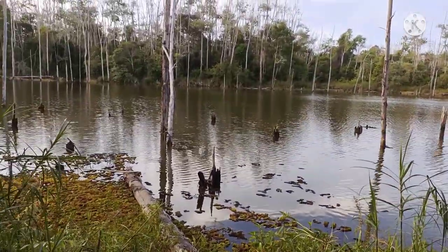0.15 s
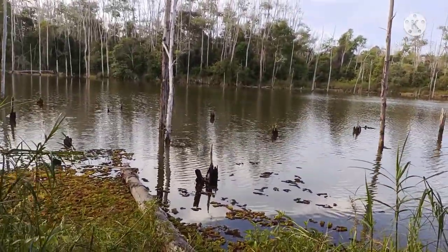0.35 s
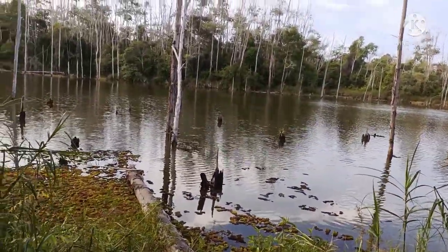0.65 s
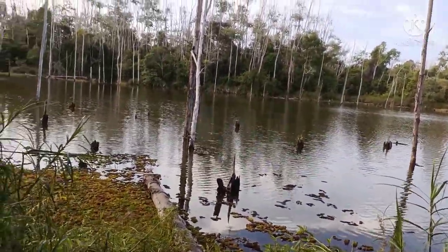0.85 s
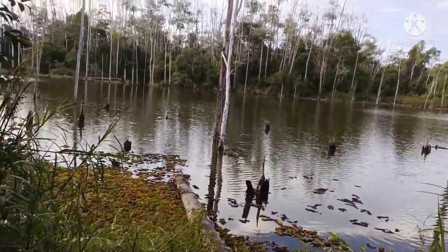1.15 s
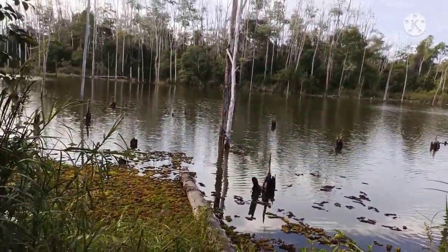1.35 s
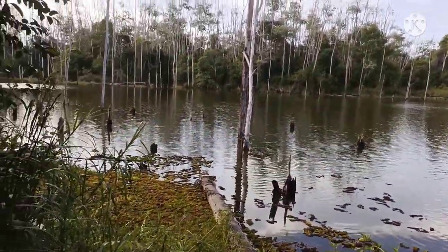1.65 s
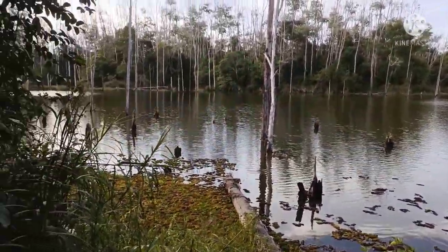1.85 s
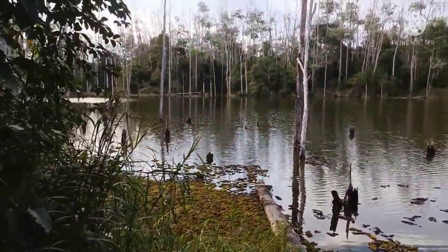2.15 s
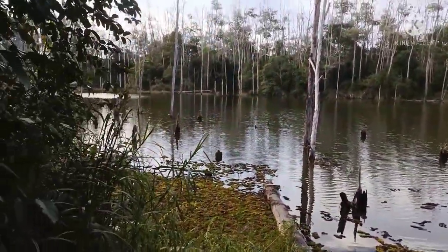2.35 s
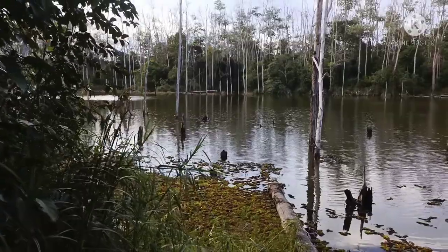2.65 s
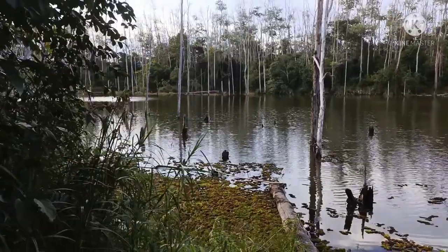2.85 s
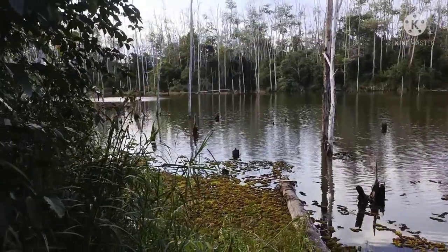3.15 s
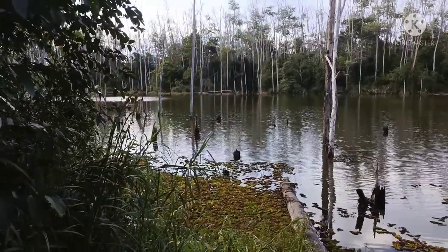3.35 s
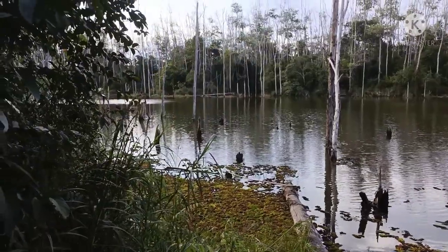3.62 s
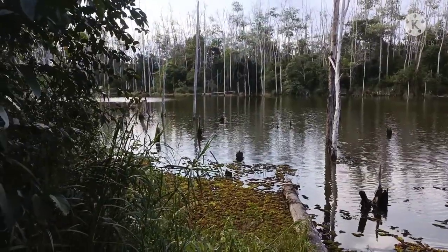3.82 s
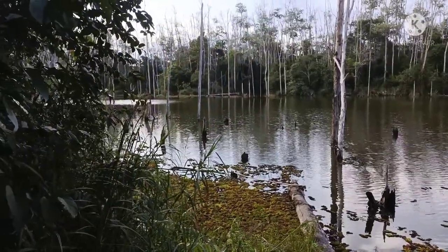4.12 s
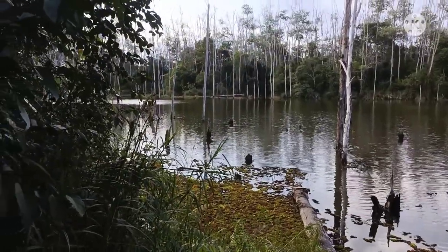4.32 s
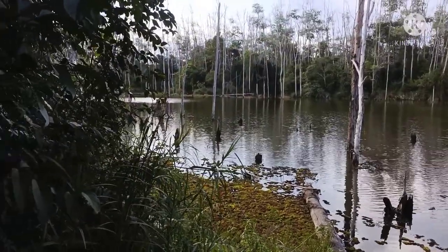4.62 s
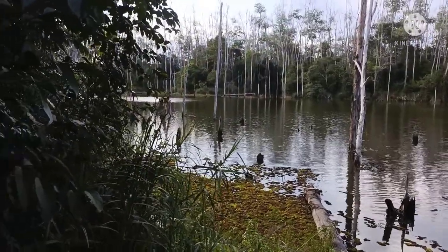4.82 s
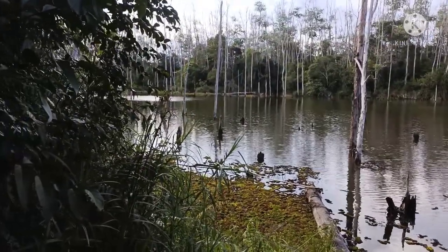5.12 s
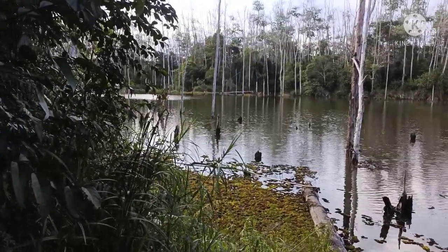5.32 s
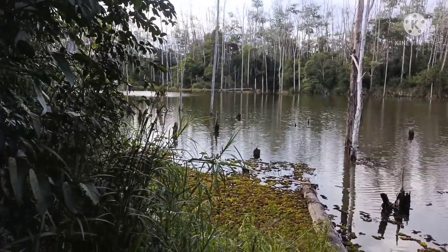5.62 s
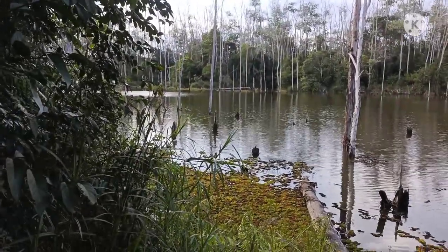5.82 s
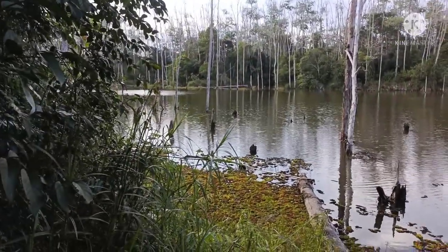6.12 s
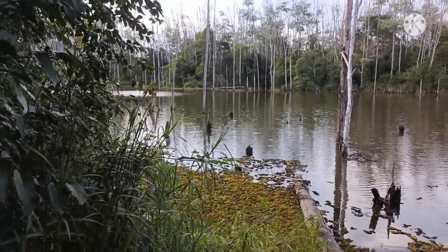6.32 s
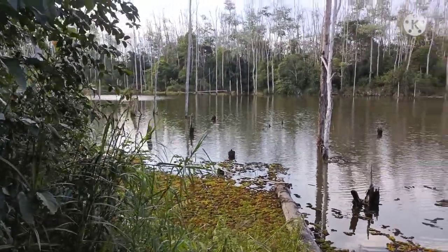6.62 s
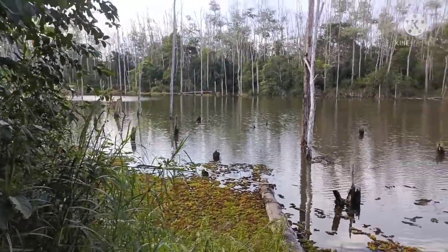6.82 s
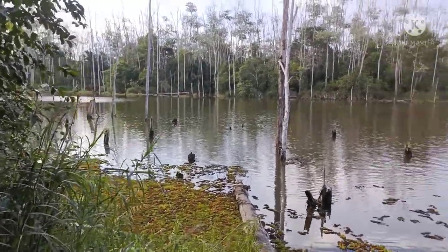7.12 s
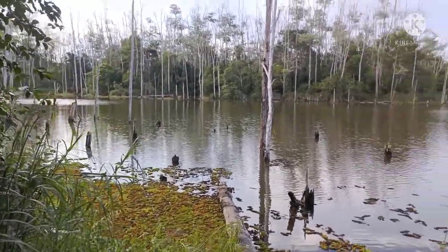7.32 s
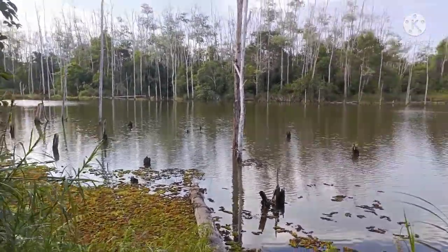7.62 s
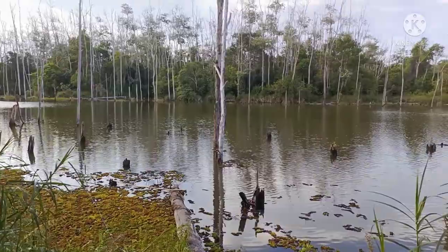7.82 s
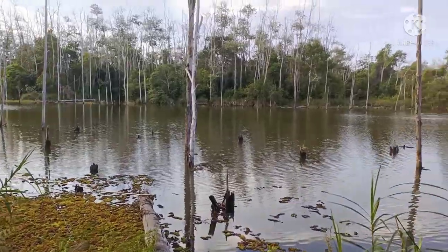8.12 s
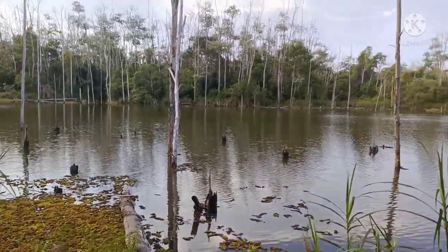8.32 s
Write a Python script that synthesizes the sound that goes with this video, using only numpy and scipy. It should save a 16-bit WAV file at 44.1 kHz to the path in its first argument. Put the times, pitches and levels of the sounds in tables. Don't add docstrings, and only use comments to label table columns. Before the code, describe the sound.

Outdoor swamp heard through a handheld phone. A close cricket chirps about twelve times a second over a continuous high chorus, with cicadas buzzing and a katydid rasping. Feet and cloth brush dry grass close by, with ticks and sharp stem snaps, until about three and a half seconds. Distant birds whistle and swoop with short woodland echoes, a faint frog toks, and wind and a far engine rumble up near the end.

```python
import sys
import numpy as np
from scipy import signal
from scipy.fft import rfft, irfft
from scipy.io import wavfile

SR = 44100
rng = np.random.default_rng(int(sys.argv[2]) if len(sys.argv) > 2 else 0)


def boost(x):
    u = np.asarray(x, float) / 20
    return 10 ** u


def to_wav(sig):
    pcm = np.clip(np.atleast_2d(sig), -1, 1) * 32767
    pcm = np.round(pcm).astype(np.int16)
    wavfile.write(sys.argv[1], SR, pcm.T)


N = 373086


def rms_one(x):
    return x / np.sqrt(np.mean(x ** 2) + 1e-20)


def in_time(rows):
    s, level = np.transpose(rows)
    return np.interp(np.arange(N) / SR, s, level, right=level[-1])


def colour(x, spectrum):
    hz, db = np.transpose(spectrum)
    log_hz = np.log(np.arange(N // 2 + 1) * SR / N + 1)
    gain = boost(np.interp(log_hz, np.log(hz), db))
    return rms_one(irfft(rfft(x) * gain, N))


def drift(rate):
    r = np.exp(-80 * np.pi * rate / SR)
    white = rng.standard_normal(N // 40 + 2002)
    slow = signal.lfilter([1], [1, -2 * r, r * r], white)[2000:]
    return np.interp(np.arange(N) / 40, np.arange(len(slow)), rms_one(slow))


def resonate(x, hz, width_hz):
    r = np.exp(-np.pi * width_hz / SR)
    for _ in range(2):
        x = signal.lfilter([1, 0, -1], [1, -2 * r * np.cos(2 * np.pi * hz / SR), r * r], x + 1e-18)
    return rms_one(x)


def band(x, low_hz, high_hz, order=2):
    sos = signal.butter(order, [low_hz, high_hz], "band", fs=SR, output="sos")
    return signal.sosfilt(sos, x + 1e-18)


def add(out, s, sound):
    i = round(s * SR)
    out[i:i + len(sound)] += sound[:max(N - i, 0)]


def note(length, from_hz, to_hz, glide, edge, fainter_db=0):
    t = np.arange(int(length * SR)) / SR
    hz = to_hz + (from_hz - to_hz) * np.exp(-t / glide)
    ends = np.clip(np.minimum(t, length - t) / edge, 0, 1)
    octaves_off = np.abs(np.log2(hz / to_hz))
    shape = np.sin(np.pi / 2 * ends) ** 2 * boost((fainter_db - 8) * octaves_off)
    return np.sqrt(2) * shape * np.sin(2 * np.pi * (np.cumsum(hz) / SR + rng.random()))


def swells(s, hold, db, rise_db_per_s, fall_db_per_s):
    t = np.arange(0, N + 64, 64) / SR
    s, hold, db = (np.reshape(v, (-1, 1)) for v in (s, hold, db))
    before, after = np.clip(s - t, 0, None), np.clip(t - s - hold, 0, None)
    each_db = db - rise_db_per_s * before - fall_db_per_s * after
    power = np.sum(boost(np.maximum(2 * each_db, -400)), axis=0)
    return np.interp(np.arange(N) / SR, t, np.sqrt(power))


def pulses(per_s, jitter, spread_db):
    count = np.cumsum(per_s * (1 + jitter * drift(3.0)) / SR)
    clicks = np.diff(np.floor(count), prepend=0) > 0
    return clicks * boost(spread_db * rng.standard_normal(N)), count


def echo(x, tail, wet_db):
    return x + boost(wet_db) * signal.fftconvolve(x, tail / np.linalg.norm(tail))[:N]


def forest(x, t60, wet_db):
    t = np.arange(SR // 2) / SR
    return echo(x, rng.standard_normal(len(t)) * boost(-60 * t / t60) * np.minimum(t / 0.003, 1), wet_db)


def held_tail(x, spread_s, wet_db):
    t = np.arange(SR // 2) / SR
    fade = np.exp(-(t / spread_s) ** 2) + .17 * np.exp(-t / .11)
    return echo(x, rng.standard_normal(len(t)) ** 3 * fade * np.minimum(t / .012, 1), wet_db)


# pitch in Hz, level in dB per Hz.
AIR_SPECTRUM = [(15, -63), (25, -50), (101, -6.5), (133, -4.5), (366, -16.5), (634, -23.5), (679, -22.5),
                (1150, -22), (2400, -27), (3620, -26.5), (4450, -32.5), (6000, -43.5), (7800, -71),
                (13200, -120)]


def swamp_air():
    stir_db = .8 * drift(4.0)
    return boost(-65.5 + stir_db) * colour(rng.standard_normal(N), AIR_SPECTRUM)


# time of the peak in seconds, peak level in dB.
GUSTS = [(0, -57.5), (1.32, -59), (1.842, -51.5), (4.95, -68), (5.561, -58.5), (5.74, -59), (5.968, -68),
         (6.17, -64), (7.089, -62), (7.759, -44), (8.37, -45)]


def gust_gain():
    s, db = np.transpose(GUSTS)
    return swells(s, 0, db, rise_db_per_s=212, fall_db_per_s=177.5)


def wind(gusts):
    white = rng.standard_normal(N)
    rumble = resonate(white, 68, 24) + 0.12 * rms_one(band(white, 30, 48))
    return (boost(-64) + gusts) * rumble


def thumps():
    out = np.zeros(N)
    length_s = 0.0885
    for s, db in GUSTS:
        thump = note(length_s, 79, 68.5, 0.041, edge=length_s / 2)
        add(out, max(s - length_s / 2, 0), boost(db - 1) * thump)
    return out


# time in seconds, level in dB.
ENGINE_HUM = [
    (0, -67),
    (1.2, -64),
    (1.74, -66),
    (3.5, -61),
    (5.48, -66),
    (6.2, -69),
    (7.1, -62.5),
    (7.6, -48),
    (8.46, -51.5),
]
# time in seconds, level in dB.
ENGINE_OVERTONE = [
    (0, -78),
    (.7, -66),
    (2, -75),
    (4.8, -70.5),
    (5.25, -58.5),
    (5.6, -75),
    (7, -78),
    (8.46, -114),
]


def engine(gusts):
    white = rng.standard_normal((2, N))
    boom = gusts * boost(-9 + 2 * np.arange(N) / SR)
    hum = (boost(in_time(ENGINE_HUM)) + boom) * resonate(white[0], 101.54, 12.5)
    overtone = boost(in_time(ENGINE_OVERTONE)) * resonate(white[1], 341.0, 93)
    return hum + overtone + boost(-85.0) * resonate(white[1], 370.7, 13)


# start in seconds, level in dB.
FROG_TOKS = [(1.9, -66.5), (2.55, -70.5), (4.15, -73), (4.645, -72), (5.12, -79), (5.75, -69), (6.245, -72),
             (6.715, -74), (7.335, -67.5), (7.82, -78), (8.3, -71.5)]


def frog():
    out = np.zeros(N)
    for s, db in FROG_TOKS:
        add(out, s, boost(db + 6.0) * note(0.043, 909, 588, 0.0231, 0.013))
    return held_tail(out, spread_s=0.059, wet_db=-2.0)


def level_notes(rows):
    return [(s, length, hz * 1.011, hz, 0.0075, db) for s, length, hz, db in rows]


def gliding_notes(rows, share):
    return [(s, length, from_hz, to_hz, share * length, db) for s, length, from_hz, to_hz, db in rows]


def bird_voice(notes, hoarse, rattle, fainter_db=0):
    voice = np.zeros(N)
    for s, length, from_hz, to_hz, glide, db in notes:
        add(voice, s, boost(db - 2.0) * note(length, from_hz, to_hz, glide, 0.0061, fainter_db))
    return voice * (np.sqrt(1 - hoarse ** 2) + hoarse * rattle)


# start in seconds, length in seconds, pitch in Hz, level in dB.
COOS = [(.41, 0.08, 3160, -50), (.495, 0.056, 3150, -67), (1.07, 0.11, 1280, -66),
        (2.005, 0.055, 1170, -67), (2.08, 0.024, 1033, -60), (4.17, 0.031, 1192, -72),
        (1.896, 0.024, 972, -60), (3.19, 0.14, 1248, -61), (3.43, 0.092, 1272, -58),
        (4.25, 0.014, 990, -56), (7.03, 0.019, 1028, -72), (7.15, 0.028, 1090, -71),
        (7.24, 0.046, 1000, -70), (3.64, 0.054, 1270, -71.5), (7.29, 0.081, 1264, -56),
        (7.42, 0.028, 1250, -63.5), (7.69, 0.024, 1178, -71), (7.49, 0.034, 1243, -71),
        (7.795, 0.028, 1234, -71.5), (7.87, 0.033, 1224, -68.5)]
PIPS = [(.435, 0.02, 1750, -58), (3.0, 0.083, 2850, -74), (3.22, 0.047, 2200, -61),
        (2.63, 0.059, 1934, -64), (3.71, 0.014, 2150, -55.5), (4.95, 0.0095, 1880, -58),
        (5.255, 0.025, 3020, -70), (4.99, 0.012, 2200, -65), (5.48, 0.028, 2010, -68),
        (5.51, 0.041, 2680, -66.5), (5.6, 0.058, 2760, -69.5), (6.13, 0.03, 2800, -64),
        (6.35, 0.045, 2790, -64), (6.5, 0.04, 2777, -71.5), (6.855, 0.016, 1990, -59.5),
        (.29, 0.028, 2430, -61), (.29, 0.026, 3050, -58), (2.665, 0.016, 2550, -63),
        (3.09, 0.016, 2520, -59.5), (3.31, 0.13, 1824, -69), (3.8, 0.026, 2336, -65),
        (5.925, 0.034, 2770, -63), (6.03, 0.043, 2740, -61.5), (6.01, 0.034, 1770, -75),
        (6.735, 0.022, 2420, -72), (6.95, 0.022, 2630, -77), (6.97, 0.014, 1820, -70),
        (7.1, .02, 2440, -78)]
SEEPS = [(.27, 0.085, 3780, -62), (2.78, 0.029, 3820, -64), (3.892, 0.093, 3740, -65),
         (3.7, 0.06, 4100, -72), (4.405, 0.024, 3650, -74), (1.06, 0.12, 3350, -73), (3.78, .07, 4100, -79),
         (5.72, .025, 4700, -72), (5.755, 0.035, 5850, -73), (3.6, 0.095, 3270, -69),
         (6.765, 0.027, 3800, -80), (6.01, 0.036, 3600, -59), (5.965, 0.04, 3800, -61),
         (4.955, 0.029, 5780, -59), (4.96, 0.088, 4970, -75), (5.01, 0.1, 3300, -58),
         (5.66, 0.057, 3710, -71), (5.735, 0.06, 3690, -65.5), (5.74, .025, 5600, -75),
         (6.16, 0.068, 3760, -61.5), (6.68, 0.057, 3510, -76.5), (7.575, 0.02, 5460, -77),
         (7.64, 0.16, 3800, -68), (7.76, 0.12, 3260, -65), (9.2, 0.076, 2920, -68),
         (5.11, 0.051, 3300, -76), (5.785, 0.05, 4950, -75), (7.65, .13, 4420, -68),
         (6.41, 0.065, 4330, -84), (4.03, 0.074, 3750, -67), (7.95, 0.045, 4500, -59),
         (8.0, 0.09, 4520, -67)]
# start in seconds, length in seconds, first pitch in Hz, end pitch in Hz, level in dB.
SWOOPS = [(.378, 0.04, 2400, 3200, -52), (2.91, 0.11, 2164, 1804, -58), (3.12, 0.061, 2205, 1750, -49),
          (4.61, 0.053, 3900, 3174, -55), (4.935, 0.075, 6020, 3330, -45.5),
          (5.815, 0.058, 3500, 3090, -55.5), (7.58, 0.06, 5500, 3200, -51), (7.625, 0.13, 3400, 2867, -54),
          (7.77, 0.056, 3480, 3206, -58), (7.905, 0.06, 3620, 4610, -63), (7.985, 0.045, 4450, 3750, -65),
          (6.73, 0.035, 1250, 2050, -68), (6.945, 0.043, 1350, 2090, -67), (7.06, 0.041, 1300, 1990, -71.5)]
SLIDES = [(.72, 0.14, 4480, 4200, -76), (1.58, 0.17, 4550, 4400, -66), (1.887, 0.47, 4550, 4300, -62.5),
          (2.44, 0.092, 4100, 3500, -55), (2.56, 0.039, 3560, 2000, -54.5), (2.725, 0.12, 4480, 4330, -68),
          (2.87, 0.2, 4550, 4320, -69), (2.8, 0.12, 3850, 3774, -69), (2.47, 0.092, 3300, 2950, -59.5),
          (2.62, 0.1, 3600, 3380, -73), (3.23, 0.11, 3450, 3250, -73), (5.243, 0.053, 4650, 4530, -71),
          (5.62, .035, 5260, 3920, -68.5), (5.78, 0.065, 4950, 4770, -71), (5.77, 0.062, 4450, 4500, -67),
          (5.83, 0.074, 4800, 4300, -62), (5.96, 0.08, 4600, 4400, -81), (5.965, 0.039, 4100, 3710, -59),
          (5.97, 0.044, 2600, 1900, -71), (6.11, 0.042, 3300, 2480, -64), (5.9, 0.14, 4110, 3500, -58),
          (5.93, 0.064, 3765, 1990, -57), (5.87, 0.099, 3700, 3300, -58.5), (6.365, 0.04, 2900, 1750, -60),
          (7.06, 0.05, 4660, 3590, -70), (8.12, 0.1, 4550, 4350, -70)]


def birds():
    rattle = rms_one(band(rng.standard_normal(N), 29, 190))
    nearer = bird_voice(level_notes(COOS), .15, rattle)
    nearer += bird_voice(level_notes(PIPS), .4, rattle)
    nearer += bird_voice(level_notes(SEEPS), .35, rattle)
    midway = bird_voice(gliding_notes(SWOOPS, 0.33), .3, rattle, fainter_db=-6)
    farther = bird_voice(gliding_notes(SLIDES, 0.62), .6, rattle)
    for when, pitch, bend, loud in rng.random((170, 4)):
        hz = 1100 * 3.5 ** pitch
        twitter = note(.024, hz * (.9 + .2 * bend), hz, .02, .009)
        add(farther, when * N / SR, boost(-91 + 6 * loud) * twitter)
    waver = boost(3.5 * drift(30))
    out = boost(2.5) * held_tail(nearer * waver, spread_s=0.029, wet_db=-1.5)
    out += boost(-.5) * held_tail(midway * waver, spread_s=0.051, wet_db=2.0)
    return out + boost(-4.0) * held_tail(farther * waver, spread_s=0.062, wet_db=8.5)


# time in seconds, level in dB.
KATYDID_LEVEL = [
    (0, -69),
    (.8, -63),
    (1.9, -61),
    (2.1, -61),
    (2.94, -62.5),
    (4.3, -73.5),
    (7.87, -60),
    (7.93, -74),
    (8.46, -73),
]


def katydid():
    swing = np.cos(2 * np.pi * (9.18 * np.arange(N) / SR - .2))
    stroke = 0.58 + 0.45 * np.clip(1.2 * swing + .8, 0, 1)
    rasp = rng.standard_normal((2, N))
    wings = resonate(rasp[0], 9540, 500) + 1.55 * resonate(rasp[1], 10160, 1200)
    return boost(in_time(KATYDID_LEVEL) + drift(2.1)) * stroke * band(wings, 9610, 10670, order=5)


# time in seconds, level in dB.
HIGH_CICADA_LEVEL = [
    (0, -56),
    (1.97, -49),
    (2.02, -72),
    (2.9, -74),
    (4.3, -74.5),
    (5.0, -62.5),
    (6.76, -51.5),
    (7.9, -50.5),
    (8.46, -54.5),
]
# start in seconds, hold in seconds, level of the
# added part in dB against the resting level.
OCTAVE_BOUTS = [
    (4.2, 0.73, 2),
    (5.9, 1.15, -4),
]


def cicadas():
    clicks, _ = pulses(140.6, jitter=0.0036, spread_db=0.0)
    high = resonate(clicks, 8735, 210) + 1.23 * resonate(rng.standard_normal(N), 8610, 610)
    high = boost(in_time(HIGH_CICADA_LEVEL)) * band(high, 8280, 9130, order=6)

    clicks, count = pulses(140.0, jitter=0.011, spread_db=4.0)
    accent_db = 4.5 * np.cos(np.pi * np.floor(count)) + 2.7 * np.cos(2 * np.pi * count / 8)
    clicks = rms_one(clicks * boost(accent_db))
    clicks = clicks + 1.6 * rng.standard_normal(N)
    low = band(resonate(clicks, 6748, 420) + 0.48 * resonate(clicks, 7080, 490), 6577, 8700, order=5)
    bouts = 1 + swells(*np.transpose(OCTAVE_BOUTS), 25, 60)
    octave = band(resonate(clicks, 13100, 2600), 13440, 16500, order=3)
    octave = boost(-19.5 + drift(.6)) * bouts * octave
    return forest(high + boost(-57.5) * (low + octave), 0.28, wet_db=-6.0)


SINGERS = {"high": (8228, 12.97, .044), "high again": (8228, 12.97, .040), "low": (7895, 12.25, .069),
           "lowest": (7835, 12.15, .045), "lowest again": (7835, 12.35, .053), "far": (7875, 12.9, .018),
           "farther": (7965, 12.6, .058)}
# singer's name, start in seconds, end in seconds, level in dB.
SONG_BOUTS = [("high", 0, 2.7, -43), ("high", 3.2, 4.4, -46), ("high again", 4.58, 5.9, -47),
              ("high again", 5.9, 7.1, -46), ("high again", 7.1, 8.46, -44), ("low", 0, 2.4, -47.5),
              ("low", 2.2, 5.5, -42.5), ("low", 5.5, 8.46, -47), ("lowest", 0, .85, -45),
              ("lowest again", 5.5, 6.65, -40), ("far", 0, 8.46, -49), ("farther", 0, 8.46, -51.5)]


def cricket_chorus():
    far = np.zeros(N)
    for name, start, end, db in SONG_BOUTS:
        hz, per_s, first = SINGERS[name]
        beats = np.arange(first, N / SR, 1 / per_s)
        chance = rng.standard_normal((120, 3))
        for at, (late, loud, sharp) in zip(beats, chance):
            if start <= at < end:
                chirp = note(0.028, hz + 45 + 12 * sharp, hz - 45, 0.038, 0.0064)
                add(far, abs(at + .002 * late), boost(db + 1.44 * loud) * chirp)
    return far


# time in seconds, level in dB.
NEAR_CRICKET_LEVEL = [(0, -45.5), (.47, -37), (.71, -40), (1.2, -34), (1.5, -41.5), (1.94, -40), (2.2, -61),
                      (2.66, -36.5), (3.39, -38.5), (3.64, -33.5), (3.88, -49.5), (4.2, -37.5), (4.95, -34),
                      (5.6, -36), (5.9, -40.5), (6.4, -38), (7.2, -36.5), (8.46, -51)]


def near_cricket():
    near = np.zeros(N)
    level_db = in_time(NEAR_CRICKET_LEVEL)
    first_s, chirps_per_s = .065, 12.346
    for at in np.arange(first_s, N / SR, 1 / chirps_per_s):
        chirp = note(0.034, 8060, 7990, 0.049, 0.011)
        add(near, at, boost(level_db[int(at * SR)] + rng.normal(0, 1.0)) * chirp)
    return near


def crickets():
    near, far = near_cricket(), cricket_chorus()
    haze = resonate(rng.standard_normal(N), 7871, 190) + 0.68 * resonate(rng.standard_normal(N), 8153, 160)
    haze = boost(-44.0) * band(haze, 7510, 8300, order=3)
    return near + forest(far + 0.2 * near, 0.67, wet_db=-4.0) + haze


# pitch in Hz, level in dB per Hz.
GRASS_SPECTRUM = [(300, -45), (500, -11), (750, -4), (1050, -1), (1800, -6), (3600, -5), (4600, -10),
                  (5700, -23), (9300, -21), (10800, -12), (11800, -19), (15000, -20), (16500, -24)]


def grass_swish():
    born = rng.random(N) < 2500 * boost(5.0 * drift(40)) / SR
    strength = boost(2.4 * np.minimum(rng.exponential(1, N), 5))
    grains = born * strength * rng.choice([-1, 1], N)
    dealt = rng.integers(0, 12, N)
    streaks = np.zeros(N)
    for k, hz in enumerate(np.linspace(800, 4600, 12) + rng.normal(0, 80, 12)):
        streaks += boost(4.5 * drift(5.5)) * resonate(grains * (dealt == k), hz, 110)
    mix = rms_one(grains) + 0.74 * rng.standard_normal(N) + .27 * rms_one(streaks)
    return colour(mix, GRASS_SPECTRUM)


# start in seconds, hold in seconds, level in dB, dull part in dB, bright part in dB.
STROKES = [(0.008, 0.01, -47.5, -6, -4.5), (0.072, 0.1, -46.5, -3, -1), (0.21, 0.063, -51, 2.5, 1),
           (0.398, 0.055, -58, 5, -14), (0.68, 0.007, -71.5, -2, 12), (0.916, 0.022, -46, -2, 4.5),
           (0.958, 0.045, -55, 0, 4), (1.03, 0.029, -54.5, -3, 3), (1.07, 0.12, -61, 0, 1),
           (1.164, 0.021, -52.5, -8, 2), (1.196, 0.19, -43.5, -0.5, 0.5), (1.332, 0.13, -46, 2, -0.5),
           (1.484, 0.073, -50, 2, 2.5), (1.59, 0.14, -69, -3.5, 8), (1.988, 0.054, -66.5, -1, 11),
           (2.053, 0.04, -61, -8, 5.5), (2.098, 0.036, -52, -14, -0.5), (2.132, 0.13, -48.5, 0, 0),
           (2.281, 0.16, -55, -3, -3.5), (2.73, 0.015, -68, -9, -5), (2.78, 0.0096, -66, -13, -3),
           (2.887, 0.74, -73.5, -1.5, 7.5), (3.112, 0.012, -61.5, 2, 2), (3.189, .005, -53.5, -1.5, 0),
           (3.306, 0.0035, -52.5, -5, 2.5), (3.368, 0.11, -63.5, -5.5, 2.5), (3.47, 0.11, -51, -6.5, 3.5),
           (3.78, 0.084, -74.5, 5, 19), (4.026, 0.18, -78.5, 5.5, 3), (4.249, 0.014, -71.5, 2, 4),
           (4.98, 0.03, -99, 0, 34)]


def grass():
    swish, flicker = grass_swish(), drift(27)
    s, hold, db, dull_db, bright_db = np.transpose(STROKES)
    deep_db = dull_db + (db + dull_db + 42)
    # sign (neighbours alternate), share in dB, lift in dB, patch edges in Hz
    parts = ((-1, deep_db, -4.0, (300, 880)),
             (1, dull_db, 1.5, (880, 1150, 1450, 1900)),
             (-1, 0, 3.5, (1900, 2500, 3400, 4600, 6500)),
             (-1, bright_db, -1.0, (6500, 9500, 12000, 19000)))
    out = np.zeros(N)
    for sign, share_db, lift_db, edges in parts:
        patches = np.zeros(N)
        for k, (low, high) in enumerate(zip(edges, edges[1:])):
            patches += (-1) ** k * boost(2.5 * drift(9.4)) * band(swish, low, high)
        gain = swells(s, hold, db + share_db, rise_db_per_s=648, fall_db_per_s=335)
        out += sign * gain * boost(lift_db + 0.59 * flicker) * rms_one(patches)
    return out


# start in seconds, peak level in dB, pitch in Hz.
BLADE_TICKS = [(.012, -24, 2570), (.054, -45, 1190), (.112, -33, 1530), (.121, -53, 3730),
               (.232, -38, 5200), (.259, -30, 3450), (.2595, -34, 980), (.407, -35.5, 1820),
               (.8355, -51, 2980), (.939, -29, 1044), (0.9436, -30, 1270), (.9692, -29.5, 4100),
               (1.056, -36, 3400), (1.149, -45, 1340), (1.174, -44, 2170), (1.191, -38, 2540),
               (1.355, -25, 3700), (1.425, -36, 2120), (1.4975, -30.5, 2020), (1.516, -25, 1490),
               (1.995, -44, 4350), (2.057, -50, 1980), (2.092, -38, 3740), (2.13, -37, 5900),
               (2.137, -38, 1150), (2.172, -38, 790), (2.206, -42, 1500), (2.21, -40.5, 766),
               (2.248, -34, 1230), (2.298, -43, 1530), (2.39, -41, 4800), (2.41, -42, 5300),
               (2.785, -49, 2950), (3.082, -54.5, 1150), (3.112, -59, 1010), (3.288, -45, 3280),
               (3.308, -37, 3750), (3.495, -36, 1580), (3.486, -30.5, 2600), (3.494, -29.5, 3760),
               (3.535, -48, 700), (3.97, -57, 4500), (4.055, -59, 1600), (4.095, -59, 1800),
               (4.243, -56, 1410)]
# start in seconds, peak level in dB, pitch in Hz.
STEM_BREAK = [
    (3.1763, -18, 4400),
    (3.1764, -23, 3600),
    (3.1763, -24, 1450),
    (3.1764, -23, 1130),
]


def ringing(rows, low_hz, cycles):
    out, t = np.zeros(N), np.arange(SR // 20) / SR
    for s, db, hz in rows:
        add(out, s, boost(db) * np.sin(2 * np.pi * hz * t) * np.exp(-t * hz / cycles))
    return band(out, low_hz, 12000, order=3)


# start in seconds, peak level in dB, dull part in dB, bright part in dB.
SNAPS = [(0.014, -31.5, 0, 2), (0.257, -29.5, -1.5, 1), (0.403, -55, 13.5, -40), (0.902, -49, 3, 10),
         (0.932, -23.5, -1, 7), (0.9433, -26.5, 1.5, 9.5), (0.97, -50.5, -20, -12),
         (1.0293, -21.5, -2.5, -1), (1.514, -65, 22, -12), (1.694, -48.5, -18, 19), (2.128, -14, -26, -4),
         (2.248, -19.5, -18, -0.5), (2.427, -23.5, -20, -12), (2.729, -46, -26, 13), (2.78, -44, -15, 5),
         (3.1123, -70, -10, 8), (3.176, -34, -14, -10), (3.308, -29.5, -55, 1), (3.3812, -66, -16, -18),
         (4.2529, -41, -4.5, -7)]


def stems():
    dull, middle, bright = np.zeros((3, N))
    fade = np.exp(-np.arange(400) / (0.0029 * SR))
    for s, db, dull_db, bright_db in SNAPS:
        burst = 0.38 * rng.standard_normal(400) * fade
        burst[0] = 3.5
        add(dull, s, boost(db + dull_db + 14.0) * burst)
        add(middle, s, boost(db) * burst)
        add(bright, s, boost(db + bright_db) * burst)
    out = band(dull, 1000, 1850, order=5) + band(middle, 2900, 5000, order=3)
    return out + .6 * band(bright, 9000, 12000, order=3)


def scene():
    gusts = gust_gain()
    hiss = boost(-90) * rng.standard_normal(N)
    background = hiss + swamp_air() + wind(gusts) + thumps() + engine(gusts)
    animals = frog() + birds() + katydid() + cicadas() + crickets()
    ticking = ringing(BLADE_TICKS, 660, cycles=5.1) + ringing(STEM_BREAK, 1000, cycles=3.0)
    return (background + animals + grass() + ticking + stems())[None]


def top_cut(x):
    return signal.sosfilt(signal.butter(12, 15504, fs=SR, output="sos"), x)


def record(dry):
    return top_cut(dry)


dry = scene()
out = record(dry)
to_wav(out)
```